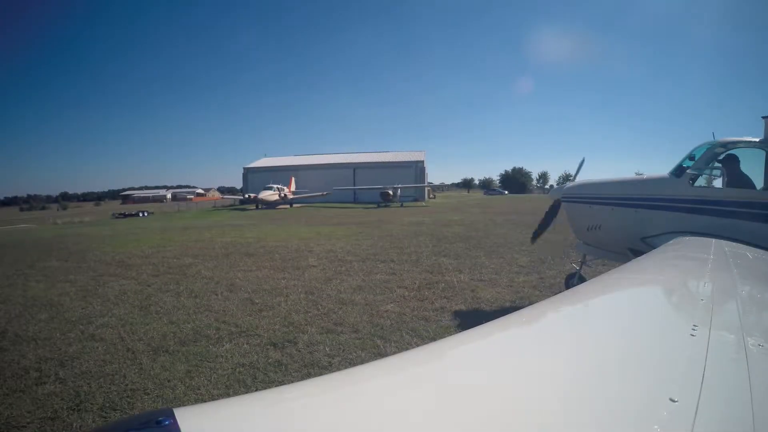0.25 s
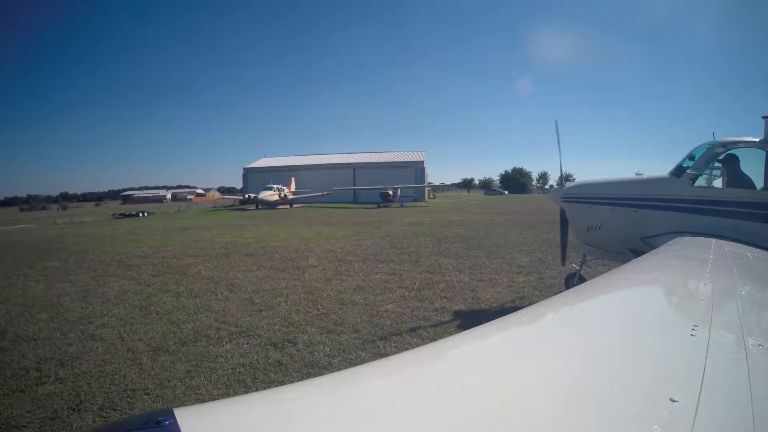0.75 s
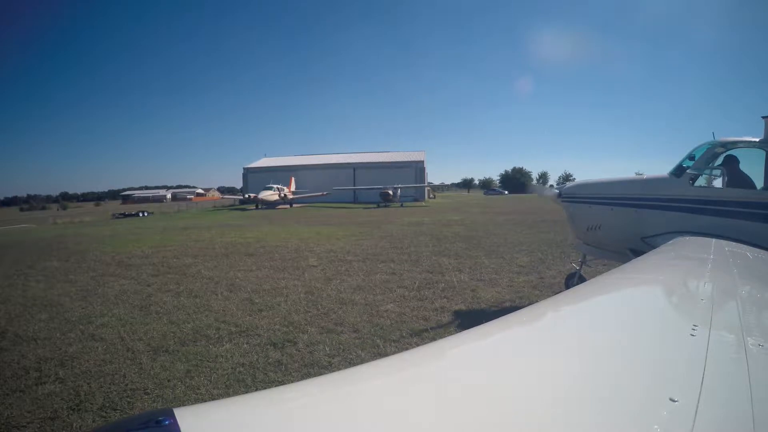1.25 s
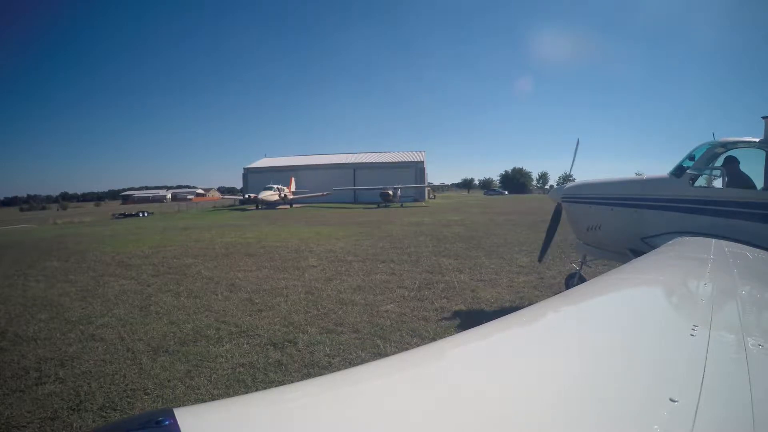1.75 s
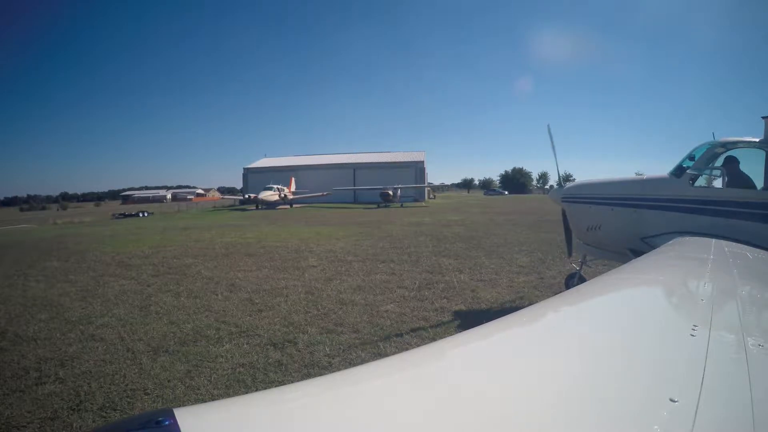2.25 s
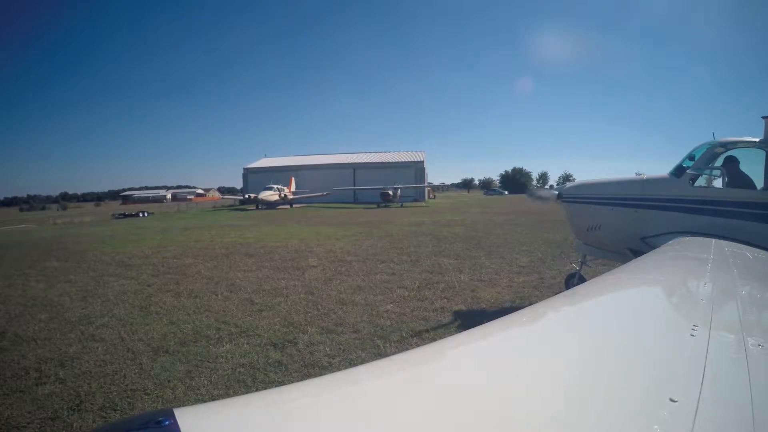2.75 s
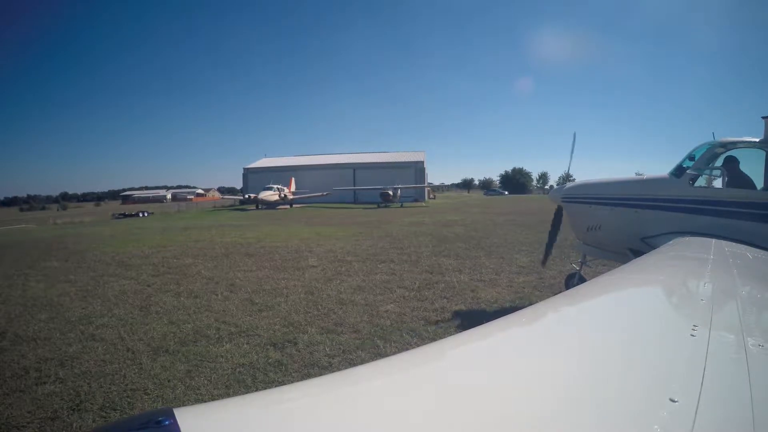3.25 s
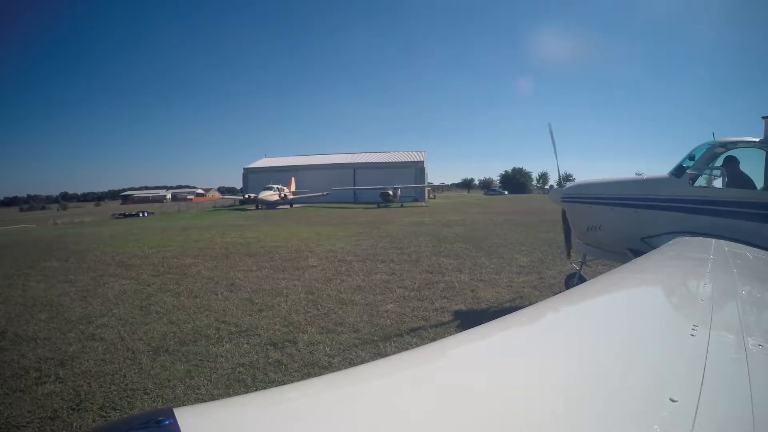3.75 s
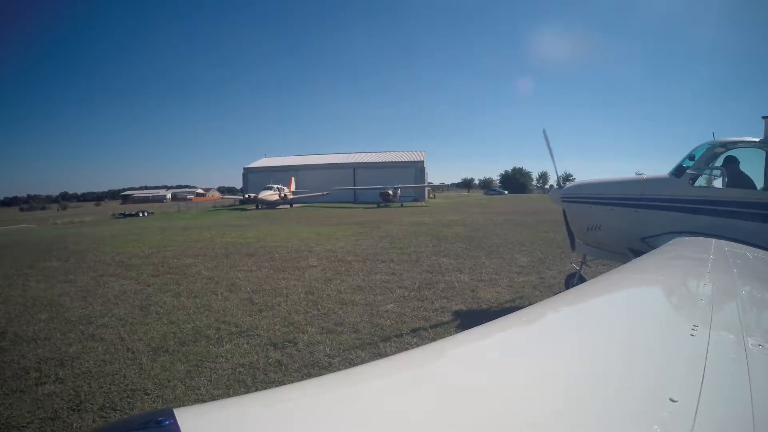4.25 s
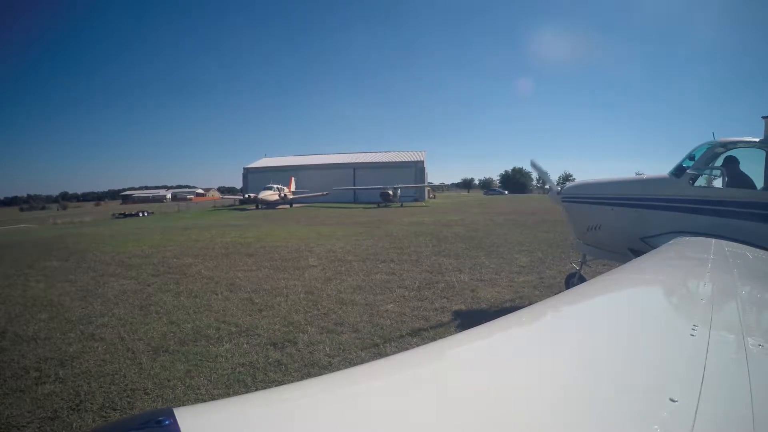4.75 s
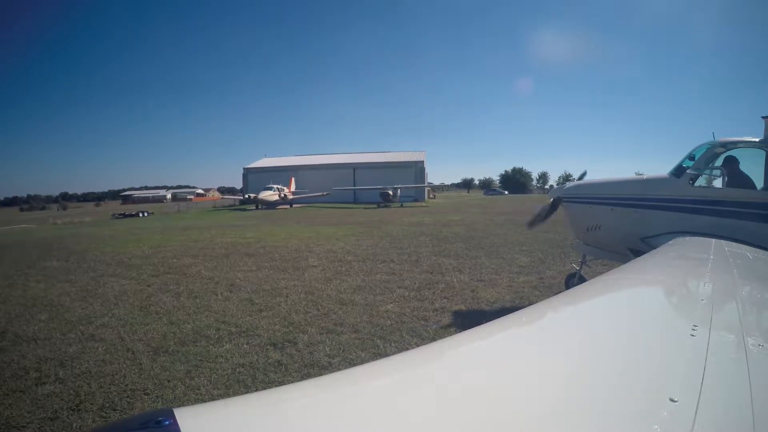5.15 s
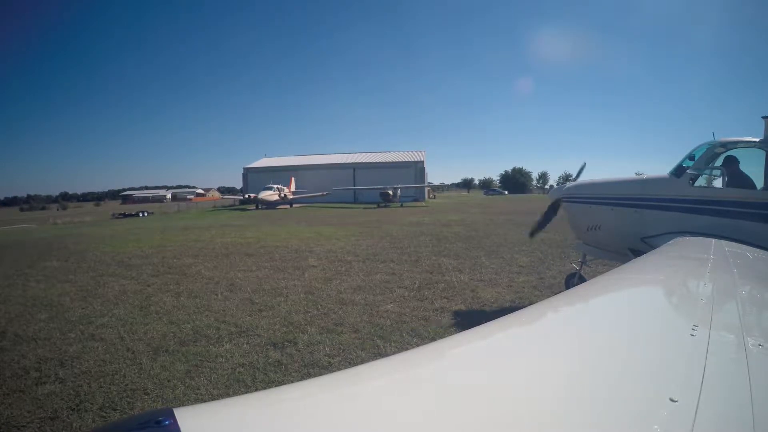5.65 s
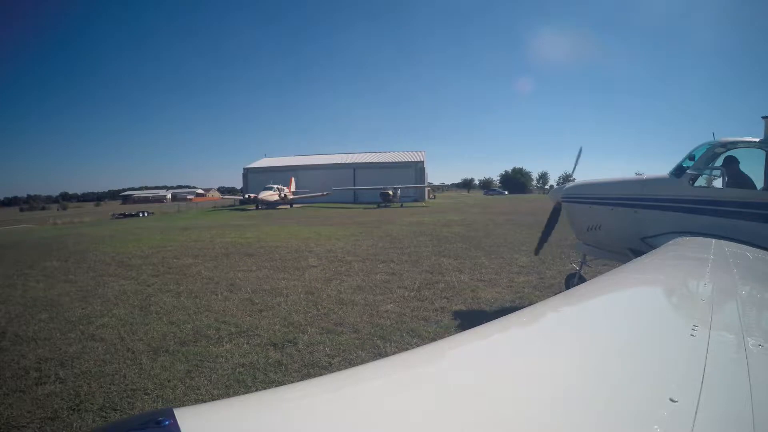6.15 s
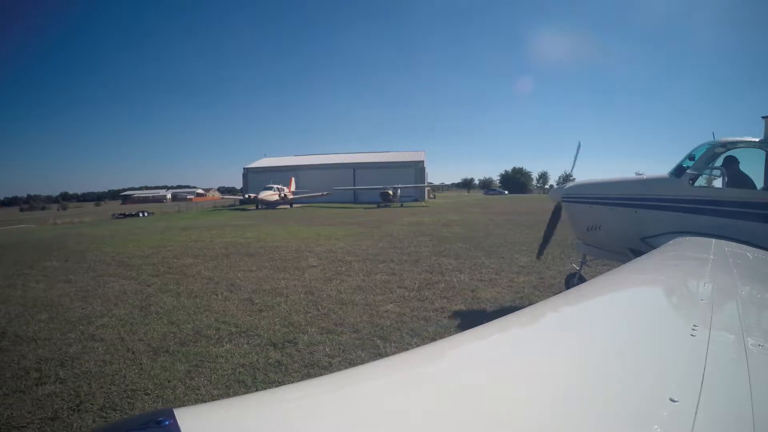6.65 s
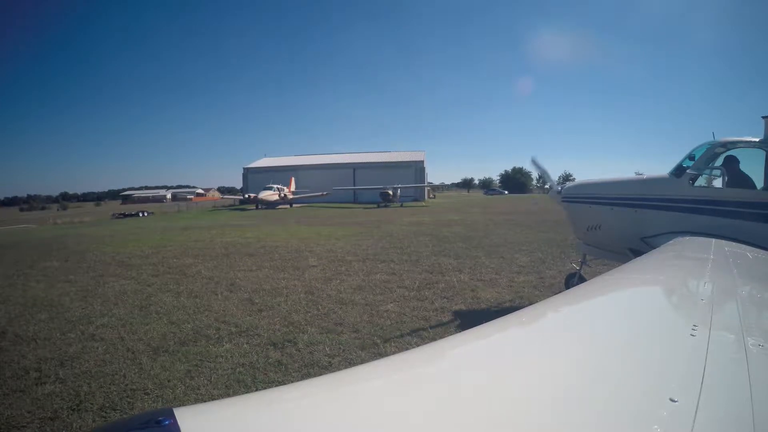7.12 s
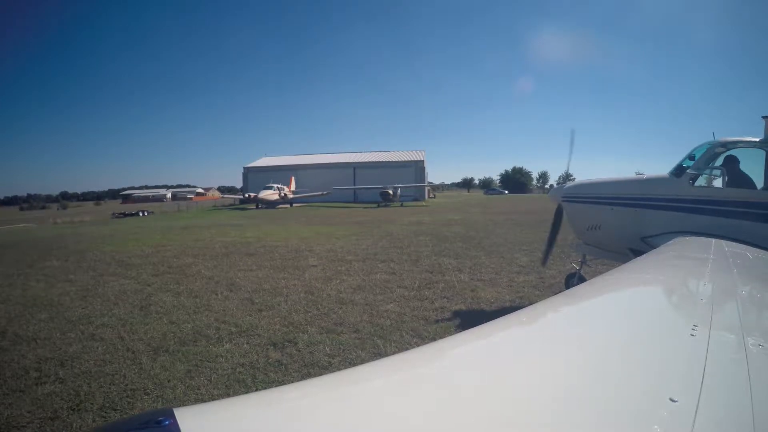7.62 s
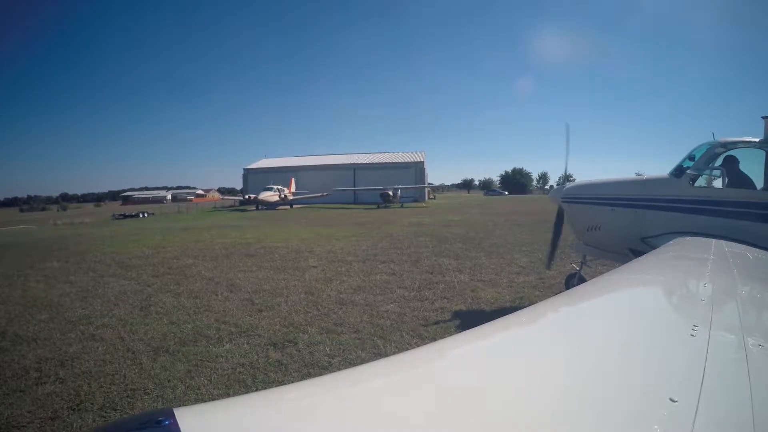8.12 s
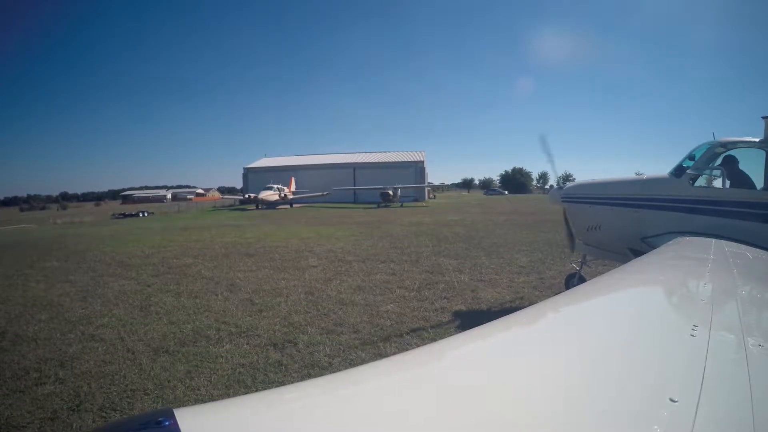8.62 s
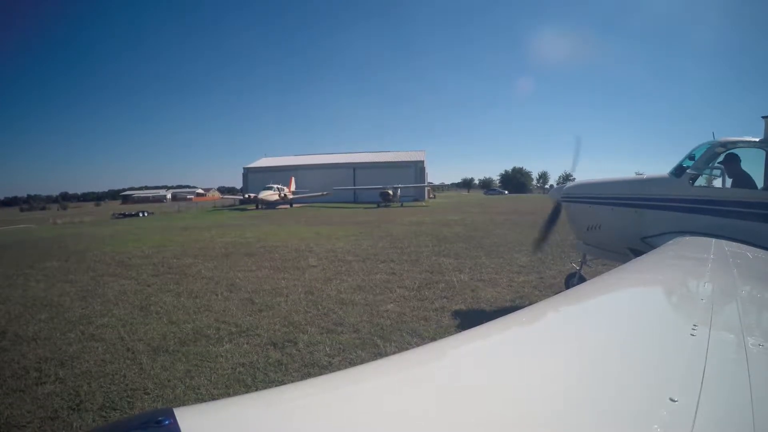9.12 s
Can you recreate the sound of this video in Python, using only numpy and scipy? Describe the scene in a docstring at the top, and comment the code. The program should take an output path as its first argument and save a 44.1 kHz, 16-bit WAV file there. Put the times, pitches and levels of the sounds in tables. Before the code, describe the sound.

A wing-mounted microphone in open air, dry and close, catches a light aircraft engine being started. From 0 to 4 seconds the starter cranks steadily, about five compressions a second: a rough gear whine climbs, then sags into a scrape, with valve rattle and a dull low exhaust puff each time. Under it the wing booms heavily near 45-50 Hz, beating and shuddering, with propeller-wash rumble. From about 4.1 seconds the rhythm becomes less even, the gears grate more, and sharp single or paired coughs crack at 4.5-4.7, 5.2 and 5.8. Between 6.5 and 7.5 coughs come more often, with gear growls and clashes. At 7.6 a loud crackling volley breaks out, the starter whine stops, and a hollow roar surges, falters, and swells again around 8.7, with barks, steel chatter and briefly singing panels. It ends still running weakly and unevenly at about 9.4 seconds.

```python
"""Starting a light aircraft's piston engine

Heard from a microphone on the wing. The starter cranks about five compressions a second: at each one
its gear whine sags, the valves rattle, the exhaust puffs and the wing booms.
Cylinders cough and kick the starter gears, then the engine catches and runs in uneven surges.
Whines are wavering tones; puffs, scrapes and rattles are noise and tiny impacts shaped by what they
pass through. Prop wash rumbles on the microphone, and panels sing briefly.
"""
import sys
import numpy as np
from scipy import signal
from scipy.fft import rfft, irfft, next_fast_len
from scipy.io import wavfile
from scipy.ndimage import uniform_filter1d, map_coordinates

SR = 44100
rng = np.random.default_rng(int(sys.argv[2]) if len(sys.argv) > 2 else 0)


def wav_record(signal):
    """Record a signal, one row per channel, as 16-bit PCM in the file named by sys.argv[1]."""
    frames = np.transpose(np.atleast_2d(signal))
    bounded = np.clip(frames, -1, 1)
    # unit amplitude maps onto the largest positive 16-bit level
    quanta = np.round(bounded * 32767).astype(np.int16)
    wavfile.write(sys.argv[1], SR, quanta)


N = 413658  # length in samples

# All levels in the tables are relative: the functions may add a few dB.
# Compression strokes while the starter turns the engine. Each row: time in seconds, lag of the
# exhaust puff in seconds, puff level in dB, grind level in dB, valve rattle level in dB.
STROKES = [(-.14, .124, -35, -44, -54), (.06, .004, -43.5, -42, -51), (.27, .048, -43, -43, -54.5),
           (.48, .004, -46, -44.5, -55.5), (.684, .04, -36.5, -44.5, -51.5),
           (.888, .052, -43, -45.5, -54.5), (1.085, .072, -42, -44.5, -54.5),
           (1.301, .032, -41.5, -42, -51.5), (1.503, .088, -42.5, -44, -55.5),
           (1.706, .072, -41.5, -43, -54), (1.915, .088, -42, -44.5, -51), (2.114, .072, -40, -44.5, -55),
           (2.315, .08, -41.5, -43, -54), (2.519, .02, -38.5, -42, -51), (2.725, .06, -42, -43.5, -54.5),
           (2.916, .07, -38, -43, -54), (3.121, .08, -41.5, -43.5, -51.5), (3.324, .06, -37.5, -44, -55),
           (3.516, .072, -43.5, -45.5, -56), (3.719, .048, -43, -42, -50.5), (3.925, .1, -44, -48, -62),
           (4.1, .012, -42, -42, -56), (4.255, 0, -41, -40.5, -54.5), (4.426, .052, -43, -40.5, -52.5),
           (4.602, .096, -48, -40.5, -55.5), (4.794, .052, -41, -40, -51), (4.96, .06, -45.5, -39.5, -55),
           (5.259, .04, -42.5, -41, -52.5), (5.426, .05, -37, -40.5, -55), (5.636, 0, -48, -43, -54),
           (5.767, .072, -41.5, -40.5, -51.5), (5.95, .068, -47, -44.5, -65),
           (6.116, .072, -40.5, -43.5, -55.5), (6.303, .06, -40, -45, -54.5),
           (6.48, .04, -40.5, -44.5, -58), (6.66, .068, -38.5, -44, -64.5), (6.807, .04, -44, -39.5, -51.5),
           (6.96, .06, -41, -38.5, -54), (7.22, .024, -50, -41, -57), (7.43, .052, -42, -41, -58),
           (7.64, .032, -39, -37, -51)]
# Sharp firings of a cylinder, often in quick pairs. Each row: start in seconds, level of the bark in dB,
# level of the low thud in dB.
FIRINGS = [(4.53, -33, -50), (4.63, -32, -50), (4.706, -27, -48), (5.243, -34, -48), (5.278, -31, -46),
           (5.762, -29.5, -48), (6.654, -34.5, -46), (6.815, -33, -50), (6.838, -32, -48),
           (6.996, -29.5, -39), (7.213, -29, -52), (7.397, -30.5, -52), (7.445, -32, -42),
           (7.632, -16, -38), (7.664, -22.5, -31), (7.688, -25, -30), (7.734, -19, -38), (7.757, -26, -43),
           (7.796, -28, -44), (7.81, -29, -43), (7.938, -25, -45), (8.003, -30, -42), (8.023, -24.5, -38),
           (8.038, -28, -44), (8.193, -32, -40), (8.286, -26, -44), (8.401, -26, -50), (8.418, -32, -52),
           (8.51, -35, -50), (8.535, -35, -48), (8.565, -35, -44), (8.677, -24, -33), (8.74, -20.5, -39),
           (8.78, -30, -36), (8.798, -19.5, -37), (8.815, -25, -43), (9.028, -32, -50), (9.118, -34.5, -46),
           (9.265, -35, -44)]
# A coughing cylinder kicks the starter gears, which growl and then clash. Each row: time in seconds,
# growl level in dB, time across the slack between the teeth in seconds, clash level in dB.
KICKS = [(4.066, -43.5, .049, -51), (4.928, -40, .056, -43.5), (6.46, -40, .05, -50),
         (6.928, -38, .054, -43), (7.197, -41.5, .055, -42.5), (7.394, -43, .06, -43.5),
         (7.598, -37, .05, -46.5)]
# Power of the engine as it catches and falters. Each row: time in seconds, level in dB.
SURGE = [(6, -78), (7.25, -56), (7.58, -63), (7.66, -38.5), (7.76, -39.5), (7.83, -44), (7.9, -52),
         (8.02, -45), (8.12, -54), (8.19, -47), (8.3, -48), (8.38, -60), (8.46, -55), (8.56, -50),
         (8.7, -44), (8.82, -43), (8.95, -59), (9.14, -51), (9.38, -51)]
# Starter gears: once cylinders cough they sing less and grate more. Each row: time in seconds,
# singing level in dB, grating level in dB.
DRIVE = [(3.5, .7, -1.5), (4.3, -3.5, 2.5), (5.8, -4, 2.8), (6.3, -3, -.5), (7.5, -5, -.5)]
# Tone colour of growling gears. Each row: frequency in Hz, relative level in dB per Hz.
GROWL = [(600, -24), (1200, -7), (1650, 5), (2350, -1), (2700, -13), (4000, -34.5), (8000, -60.5)]
# Resonances of the cowling panels. Each row: frequency in Hz, width in Hz, lift in dB.
PANELS = [(887, 54, 1), (1000, 91, 1.6), (1084, 36, 2.1), (1370, 100, 4), (1780, 18, 5.6), (1970, 26, 6.5),
          (2120, 25, 3.9), (2310, 27, 5.5)]


def amp(db):
    """Turn decibels into a gain."""
    return 10 ** (np.asarray(db) / 20)


def unit(x):
    """Scale to an average (rms) strength of 1."""
    return x / np.sqrt(np.mean(x ** 2) + 1e-20)


def curve(rows):
    """Draw straight lines through (seconds, value) rows, giving one value per sample."""
    return np.interp(np.arange(N) / SR, *np.transpose(rows))


def wobble(rate):
    """Make a smooth random curve through a number of random points a second."""
    knots = rng.standard_normal(int(N * rate / SR) + 4)
    coarse = np.arange(0, N + 8, 8)  # every eighth sample is enough for a smooth curve
    return np.interp(np.arange(N), coarse, map_coordinates(knots, [coarse * rate / SR]))


def body(x, spectrum, peaks=()):
    """Pass x through a body with a broad tone colour and narrow resonances; white noise keeps its level."""
    size = 2 * next_fast_len(N // 2 + 8192)
    hz = np.fft.rfftfreq(size, 1 / SR)
    f, level = np.transpose(spectrum)
    db = np.interp(np.log(hz + 1), np.log(f), level)
    for centre, width, lift in peaks:
        db = db + lift / (1 + (2 * (hz - centre) / width) ** 2)
    # fold the cepstrum forward in time, so that the body answers only after it is struck
    cepstrum = irfft(np.log(unit(amp(db))))
    cepstrum[1:size // 2] *= 2
    cepstrum[size // 2 + 1:] = 0
    response = np.exp(rfft(cepstrum))
    return irfft(rfft(x, size) * response, size)[:N]


def contacts(rate, share, size=N):
    """Mix tiny random impacts, rate a second, with smooth noise; the impacts get a share of the power."""
    share = np.clip(share, 0, 1)
    hits = (rng.random(size) < rate / SR) * rng.standard_normal(size)
    return np.sqrt(share) * unit(hits) + np.sqrt(1 - share) * rng.standard_normal(size)


def swells(times, levels_db, shape):
    """Add up the power of swells whose shape is (delay in s, rise in s, fall in s, gain in dB)."""
    delay, rise, fall, gain_db = shape
    t, power = np.arange(N) / SR, np.zeros(N)
    for s, db in zip(times, levels_db):
        near = slice(max(int((s - .2) * SR), 0), int((s + .5) * SR))
        u = t[near] - s - delay
        fade = np.where(u < 0, (u / rise) ** 2, np.abs(u / fall) ** 1.5)
        power[near] += amp(db + gain_db) ** 2 * np.exp(-fade)
    return power


def narrow(turn, width_hz):
    """Make a rough tone: its strength and phase wander at width_hz random points a second."""
    return unit(wobble(width_hz) * np.sin(turn) + wobble(width_hz) * np.cos(turn))


def drift(x, share, rate):
    """Let the pitch of x wander by a small share, through rate random points a second."""
    place = np.arange(N) + SR * share / rate * wobble(rate)
    return map_coordinates(x, [place], order=3, mode="nearest")


def patchy(x, depth_db):
    """Let short random patches of the spectrum swell and fade, as in turbulence."""
    z = signal.stft(x, nperseg=1024)[2]
    field = uniform_filter1d(rng.standard_normal(z.shape), size=3, axis=0)  # smooth over pitch
    field = uniform_filter1d(field, size=6, axis=1)  # smooth over time
    return signal.istft(z * unit(amp(depth_db * unit(field))), nperseg=1024)[1][:N]


def starter():
    """The rough gear whine climbs as the crank runs free and sags against each compression."""
    # Gear mesh from one compression to the next. Each row: share of the stroke (0 to 1),
    # pitch in Hz, level in dB.
    mesh = [(0, 1674, -49), (.151, 1378, -52), (.301, 1251, -60.5), (.52, 1946, -78.5), (.69, 2070, -59.5),
            (.8, 2010, -54.5), (.9, 1900, -54.5), (1, 1678, -49)]
    t = np.arange(N) / SR
    times = np.transpose(STROKES)[0]
    stroke = np.interp(t, times, np.arange(len(times))) % 1
    place, pitch, level = np.transpose(mesh)
    drive_s, sing_db, grate_db = np.transpose(DRIVE)
    turn = 2 * np.pi * np.cumsum(np.interp(stroke, place, pitch)) / SR
    # the teeth sing under light load and grate under heavy load
    free = np.interp(stroke, [.4, .65, .9, 1], [0, 1, 1, 0])
    sing = narrow(turn, width_hz=270)
    sing += amp(-9.5) * narrow(2 * np.pi * 3780 * t, width_hz=400)  # the housing rings at 3780 Hz
    sing += amp(-13.5) * narrow(2.25 * turn, width_hz=450)
    sing *= free * amp(np.interp(t, drive_s, sing_db))
    grate = narrow(turn, width_hz=500) * np.sqrt(1 - free.clip(0, 1) ** 2)
    grate *= amp(np.interp(t, drive_s, grate_db))
    return (sing + grate) * amp(np.interp(stroke, place, level)) * (t < times[-1])


def firings():
    """A cylinder fires: a hard, crackling bark and a low thud, then a weaker rush of gas."""
    # Tone colours. Each row: frequency in Hz, relative level in dB per Hz.
    bark_colour = [(120, -23), (300, -13.5), (480, -7), (700, -6.5), (1000, 8), (1400, -8), (2200, -4),
                   (2900, -25), (8000, -40), (15000, -47)]
    thud_colour = [(50, -16), (95, 0), (140, -6), (280, -9), (520, -15), (900, -28), (3000, -70)]
    t = np.arange(SR // 8) / SR
    blast = (1 - np.exp(-t / .0007)) * np.exp(-(t / .011) ** 2)
    blast += amp(-13 - 60 * t / .11)  # the rush of gas
    push = (1 - np.exp(-t / .002)) * amp(-60 * t / .11)
    barks, thuds = np.zeros((2, N + SR))
    for s, bark_db, thud_db in FIRINGS:
        start = int(s * SR)
        barks[start:][:len(t)] += amp(bark_db - 8.5) * blast
        thuds[start:][:len(t)] += amp(thud_db + .5) * push
    bark = body(contacts(rate=1200, share=.45) * barks[:N], bark_colour, PANELS)
    thud = body(rng.standard_normal(N) * thuds[:N], thud_colour)
    return drift(bark, share=.025, rate=9) + thud


def surge():
    """When several cylinders fire in a row, the exhaust gives a hollow roar."""
    # each pair: frequency in Hz, relative level in dB per Hz
    hollow = [(150, -33), (260, -5.5), (330, -1.5), (400, -3), (500, -2.5), (620, -5.5),
              (800, -12.5), (1500, -35), (4000, -70)]
    return body(contacts(rate=160, share=0.3) * amp(curve(SURGE)), hollow)


def exhaust():
    """Strokes puff air out of the pipe and the engine blows; prop wash rumbles harder with each puff."""
    # Tone colour of the pipe. Each row: frequency in Hz, relative level in dB per Hz.
    pipe_colour = [(60, -18), (100, 4), (130, 2.5), (170, -1.5), (280, -1), (340, -5.2), (550, -7),
                   (750, -8.5), (1200, -33), (3000, -65)]
    # Resonance of the pipe. Each row: frequency in Hz, width in Hz, lift in dB.
    pipe_peaks = [(282.2, 11, 7)]
    # Shape of a puff: delay in seconds, rise in seconds, fall in seconds, gain in dB.
    puff_shape = (-.01, .045, .033, .3)
    # Air leaking through the exhaust between the puffs. Each row: time in seconds, level in dB.
    leak = [(0, -44.5), (2.4, -43.5), (4.3, -44.5), (5, -47), (6.5, -48), (7.2, -53), (9.38, -48)]
    # Prop wash on the microphone. Each row: time in seconds, level in dB.
    wash_level = [(0, -40), (1.2, -42), (3.5, -38.5), (4.5, -42), (6, -46.5), (7.1, -47), (7.7, -40),
                  (8.3, -44), (8.7, -38), (9, -44), (9.38, -37)]
    times, lag, puff_db, _, _ = np.transpose(STROKES)
    power = swells(times + lag, puff_db, puff_shape)
    power = power + amp(curve(SURGE) + 2.5) ** 2 + amp(curve(leak)) ** 2
    flow = np.sqrt(power) * amp(2.2 * wobble(55) - .3)
    puffs = body(contacts(rate=300, share=0.33) * flow, pipe_colour, pipe_peaks)
    puffs = patchy(drift(puffs, share=.014, rate=6), depth_db=1.7)
    # each pair: frequency in Hz, relative level in dB per Hz
    rumble = [(30, -11), (80, 1), (115, -3.5), (145, -13.5), (180, -12), (240, -26), (1000, -57)]
    wash = body(rng.standard_normal(N), rumble)
    return puffs + wash * amp(curve(wash_level)) * np.sqrt(unit(flow))


def grind():
    """Pistons and gears scrape at compressions, kicks and surges, over a dull churning."""
    # Tone colours of the cowling and of the turning engine. Each row: frequency in Hz,
    # relative level in dB per Hz.
    cowling = [(250, -23), (500, -17), (720, -0.5), (1050, 5), (1220, -2), (1400, -1), (1650, -7),
               (2150, -11), (2400, -15.5), (2700, -23), (4500, -28), (6000, -37.5), (10000, -45.5),
               (15000, -61)]
    churn_colour = [(250, -24), (500, -17), (750, 0), (1060, 4), (1250, -3), (1450, -2), (1800, -11),
                    (2400, -16), (2800, -28), (8000, -50)]
    # Churning. Each row: time in seconds, level in dB.
    churn_level = [(0, -51.5), (3.8, -51.5), (4.6, -49.5), (6.3, -50.5), (7.1, -48.5), (9.38, -52)]
    # Shapes of the scrape at a stroke, the scrape at a kick and the gear growl at a stroke.
    # Each holds: delay in seconds, rise in seconds, fall in seconds, gain in dB.
    stroke_shape = (.008, .022, .064, .2)
    kick_shape = (.03, .025, .05, -1)
    growl_shape = (0, .03, .045, 0)
    times, *_, grind_db, _ = np.transpose(STROKES)
    kicks, kick_db, *_ = np.transpose(KICKS)
    drive_s, _, grate_db = np.transpose(DRIVE)
    power = swells(times, grind_db, stroke_shape) + swells(kicks, kick_db, kick_shape)
    load = np.sqrt(power + amp(curve(SURGE) + 4.2) ** 2) * amp(1.4 * wobble(40))
    scrape = body(contacts(rate=350, share=0.25) * load, cowling, PANELS)
    churn_gain = amp(curve(churn_level) + 1.2 * wobble(30))
    churn = body(contacts(rate=400, share=.15) * churn_gain, churn_colour, PANELS)
    strain = amp(1.6 * np.interp(np.arange(N) / SR, drive_s, grate_db) - 12)
    growl_gain = np.sqrt(swells(times, grind_db, growl_shape)) * strain
    growl = body(contacts(rate=350, share=0.4) * growl_gain, GROWL, PANELS)
    return patchy(scrape + churn, depth_db=1.3) + growl


def chatter():
    """List the bursts of steel chatter as (s, level dB, kind): at strokes, kicks, firings and between."""
    # Valve gear between the compressions and in the running engine. Each row: time in seconds,
    # clatter level in dB, ring level in dB, length in seconds.
    loose_rattles = [(5.004, -51, -55, .012), (5.085, -58, -68, .03), (7.001, -50, -51, .01),
                     (7.603, -51, -55, .016), (7.634, -45, -43, .008), (7.66, -45, -48, .04),
                     (7.722, -47, -50, .023), (7.817, -54, -56, .021), (7.859, -45, -58, .01),
                     (7.873, -52, -55, .016), (8.02, -56, -65, .014), (8.068, -49.5, -53.5, .026),
                     (8.167, -52, -68, .01), (8.19, -56, -66, .016), (8.215, -48, -58, .023),
                     (8.29, -55, -61, .022), (8.329, -51.5, -56, .034), (8.398, -58, -64, .013),
                     (8.449, -51.5, -59, .023), (8.536, -59, -66, .012), (8.58, -49, -58, .016),
                     (8.624, -54, -60, .024), (8.686, -51.5, -58, .014), (8.732, -50, -57, .025),
                     (8.789, -52.5, -56, .022), (8.833, -52, -58, .023), (8.925, -57, -70, .017),
                     (8.974, -56, -64, .023), (9.06, -53.5, -66, .016), (9.145, -57, -65, .02),
                     (9.161, -51, -65, .012), (9.191, -50, -63, .013), (9.319, -54.5, -65, .024)]
    # Weaker valve ticks after each compression. Each row: delay in seconds, relative level in dB.
    valve_ticks = [(.048, -13), (.092, -16)]
    # Kinds of chatter. Each holds: growl in dB, clatter in dB, ring in dB (all relative to the burst),
    # rise in seconds, length in seconds.
    valve_rattle = (-.5, .2, -9.3, .0085, .026)
    gear_growl = (0, -11, -15.5, .015, .036)
    gear_clash = (0, -.7, -4, .014, .027)
    growl_after_s = .013  # the teeth take up the load
    bursts = []
    for s, *_, db in STROKES:
        for delay, drop_db in [(0, 0), *valve_ticks]:
            bursts.append((s + delay, db + drop_db, valve_rattle))
    for s, db, ring_db, length in loose_rattles:
        # growl 1.5 dB below the clatter; the rise is half of the length
        bursts.append((s, db, (-1.5, 0, ring_db - db, .5 * length, length)))
    for s, db, _ in FIRINGS:
        bursts.append((s + growl_after_s, db - 30.5, gear_growl))  # a firing jolts the gears too
    for s, growl_db, slack_s, clash_db in KICKS:
        bursts.append((s + growl_after_s, growl_db, gear_growl))
        bursts.append((s + slack_s, clash_db, gear_clash))
    return bursts


def steel_part(t60, ring_share, count):
    """A click with fresh random ringing tones, as if each swarm strikes other parts."""
    t = np.arange(SR // 25) / SR
    hz = np.geomspace(1400, 12000, count)[:, None] * np.exp(.05 * rng.standard_normal((count, 1)))
    modes = rng.standard_normal((count, 1)) * np.sqrt(hz) * np.sin(2 * np.pi * hz * t)
    ring = modes.sum(0) * amp(-60 * t / t60)  # falls by 60 dB in t60 seconds
    share = np.clip(ring_share, 0, 1)
    response = np.sqrt(share / 2) * ring / np.linalg.norm(ring)  # the modes cover about half of the band
    response[0] += np.sqrt(1 - share)
    return response


def rattles():
    """Gear teeth and valve gear chatter in swarms of steel contacts that growl, clatter and ring."""
    # Tone colours. Each row: frequency in Hz, relative level in dB per Hz.
    clatter_colour = [(1000, -26.5), (2200, -16.5), (2800, -3.5), (3600, 2.5), (4600, -3), (5200, -8),
                      (6200, -15), (9000, -31)]
    ring_colour = [(4000, -30), (5600, -8.5), (6800, 2.5), (7300, -3), (8100, 2.5), (8700, -9), (9500, -3),
                   (11000, -11), (14000, -19), (16000, -33)]
    # Resonances of the steel parts. Each row: frequency in Hz, width in Hz, lift in dB.
    steel_peaks = [(2840, 30, 9), (3500, 45, 4), (3810, 80, 6), (4100, 60, 3), (4560, 90, 6), (5220, 90, 4),
                   (6820, 90, 7), (7620, 45, 6), (7730, 40, 7), (8090, 95, 7), (9010, 55, 7),
                   (9370, 150, 4)]
    t = np.arange(N) / SR
    swarms = np.zeros((3, N))
    for s, db, (*colour_db, rise, length) in chatter():
        if s < 0:
            continue
        near = slice(max(int((s - .1) * SR), 0), int((s + .1) * SR))
        u = t[near] - s + 0.002
        u = u / np.where(u < 0, rise, 0.51 * length)
        # power of the swarm: the rise and the fall have their own curves
        swell = np.where(u < 0, np.exp(-np.abs(u) ** 3), np.exp(-np.abs(u) ** 1.6))
        hits = contacts(rate=950, share=0.45, size=len(u)) * np.sqrt(swell)
        hits = unit(hits) * np.sqrt(swell.mean()) * amp(db)
        part = steel_part(t60=0.033, ring_share=.45, count=34)
        struck = signal.fftconvolve(hits, part)[:len(u)]
        swarms[:, near] += amp(colour_db)[:, None] * struck
    growl, clatter, ring = swarms * amp(.9 * wobble(110) - .3)  # the contacts come in clumps
    growl = body(growl, GROWL, PANELS)
    clatter = amp(.5) * body(clatter, clatter_colour, steel_peaks)
    ring = amp(1.5) * body(ring, ring_colour, steel_peaks)
    return growl + clatter + ring


def beats():
    """The wing's vibration beats: it dips for a moment and slips half a cycle (a complex gain)."""
    # Each row: time in seconds, level at the bottom of the dip in dB, half width in seconds.
    dips = [(0.197, -16, 0.03), (0.273, -21, 0.009), (0.521, -25, 0.015), (0.593, -7, 0.03),
            (0.777, -13, 0.03), (1.05, -8, 0.03), (1.457, -12, 0.02), (1.612, -11, 0.016),
            (1.708, -13, 0.019), (1.864, -24, 0.03), (1.955, -13, 0.024), (2.065, -11, 0.019),
            (2.145, -12, 0.015), (2.238, -21, 0.012), (2.296, -24, 0.01), (2.359, -26, 0.03),
            (2.439, -9, 0.019), (2.707, -9, 0.03), (2.845, -16, 0.03), (2.959, -12, 0.009),
            (3.033, -26, 0.023), (3.165, -21, 0.011), (3.437, -6, 0.019), (3.511, -13, 0.015),
            (3.635, -24, 0.012), (3.726, -14, 0.012), (3.963, -13, 0.026), (4.149, -20, 0.024),
            (4.208, -26, 0.018), (4.386, -23, 0.014), (4.652, -17, 0.01), (4.739, -17, 0.028),
            (4.789, -20, 0.02), (4.972, -10, 0.015), (5.338, -21, 0.022), (5.394, -16, 0.008),
            (5.724, -19, 0.019), (5.959, -12, 0.028), (6.137, -6, 0.01), (6.27, -25, 0.03),
            (6.408, -14, 0.011), (6.463, -12, 0.03), (6.662, -9, 0.008), (6.761, -12, 0.021),
            (6.964, -5, 0.03), (7.407, -10, 0.03), (7.616, -9, 0.012), (7.768, -17, 0.016),
            (7.898, -16, 0.019), (7.994, -3, 0.007), (8.123, -20, 0.013), (8.527, -22, 0.03),
            (8.583, -18, 0.023), (9.039, -8, 0.028)]
    gain = np.ones(N, complex)
    for s, depth_db, width in dips:
        start = max(int((s - 7 * width) * SR), 0)
        end = min(int((s + 7 * width) * SR), N)
        u = np.tanh((np.arange(start, end) / SR - s) / width)  # runs from -1 to 1 across the dip
        gain[start:end] *= u + 1j * amp(min(depth_db, 0)) * np.sqrt(1 - u * u)
        gain[:start] *= -1
    return gain


def wing():
    """Strokes and engine lurches make the wing boom with beats, and a looser shudder rides on top."""
    # Booms, from strokes and from lurches of the engine in its mounts. Each row: time in seconds,
    # level in dB, length in seconds, base pitch in Hz.
    booms = [(0.05, -13.0, 0.058, 43.6), (0.179, -12.0, 0.028, 48.3), (0.311, -9.5, 0.018, 46.6),
             (0.745, -8.0, 0.048, 48.9), (0.94, -14.0, 0.017, 45.9), (1.153, -15.0, 0.028, 50.9),
             (1.335, -8.5, 0.023, 46.1), (1.582, -13.5, 0.016, 44.8), (1.787, -10.5, 0.033, 46.9),
             (1.99, -15.0, 0.016, 51.0), (2.177, -9.5, 0.025, 46.0), (2.355, -7.5, 0.058, 47.2),
             (2.561, -9.5, 0.037, 50.0), (2.785, -13.0, 0.013, 43.9), (2.988, -11.0, 0.022, 45.5),
             (3.23, -15.0, 0.012, 46.5), (3.382, -11.0, 0.021, 48.1), (3.484, -11.5, 0.029, 49.9),
             (3.6, -14.5, 0.017, 44.7), (3.759, -9.5, 0.036, 46.2), (3.924, -14.5, 0.012, 49.2),
             (4.113, -12.0, 0.017, 47.5), (4.243, -9.0, 0.015, 44.4), (4.485, -9.0, 0.044, 49.4),
             (4.735, -6.5, 0.044, 49.7), (4.839, -9.5, 0.019, 44.0), (4.923, -13.0, 0.017, 49.6),
             (5.026, -11.5, 0.045, 49.2), (5.255, -14.5, 0.058, 49.4), (5.494, -8.5, 0.056, 50.4),
             (5.839, -15.0, 0.037, 49.3), (6.023, -14.0, 0.058, 50.4), (6.192, -12.0, 0.012, 49.6),
             (6.267, -7.0, 0.019, 45.5), (6.525, -9.5, 0.03, 49.8), (6.743, -9.0, 0.058, 50.2),
             (6.863, -9.0, 0.025, 46.8), (7.014, -9.5, 0.027, 50.1), (7.281, -12.5, 0.021, 48.7),
             (7.493, -10.5, 0.058, 49.7), (7.679, -7.5, 0.058, 49.7), (7.795, -15.0, 0.012, 41.7),
             (7.931, -10.0, 0.038, 48.4), (8.062, -10.0, 0.029, 47.3), (8.206, -8.5, 0.039, 47.5),
             (8.313, -8.5, 0.049, 47.6), (8.631, -11.5, 0.058, 46.1), (8.838, -10.0, 0.043, 47.8),
             (9.167, -14.0, 0.023, 48.4), (9.314, -12.0, 0.044, 45.6)]
    # Steady shaking between the jolts. Each row: time in seconds, level in dB.
    tremble = [(0, -17), (2, -16), (4, -15), (5.2, -17), (5.7, -21), (6.2, -15), (7.6, -16), (7.85, -25),
               (8.38, -20), (8.5, -28), (8.6, -13), (9.02, -16), (9.38, -14)]
    # Irregular shudder. Each row: time in seconds, level relative to the booms in dB.
    shudder_level = [(0, -7), (4, -8), (6.8, -12), (9.38, -15)]
    # Tone colour of the shudder. Each row: frequency in Hz, relative level in dB per Hz.
    wing_colour = [(12, -44), (20, -11), (27, -8), (38, -2), (45, -5), (54, -1), (60, -7), (70, -17),
                   (82, -18), (110, -41.5), (300, -100)]
    t = np.arange(N) / SR
    power = amp(curve(tremble)) ** 2
    for s, db, length, _ in booms:
        power = power + swells([s], [db], (0, .7 * length, length, 0))
    times, _, _, base_hz = np.transpose(booms)
    pitch = np.interp(t, times, base_hz)
    pitch = pitch + 1.3 * np.sqrt(power / power.max())  # harder shaking raises the pitch, up to 1.3 Hz
    pitch = pitch + 1.8 * wobble(14)  # random wander, in Hz
    turn = 2 * np.pi * np.cumsum(pitch) / SR
    boom = np.sqrt(2) * np.real(np.exp(1j * turn) * beats()) * amp(.8 * wobble(25) - .4)
    shudder = unit(body(rng.standard_normal(N), wing_colour)) * amp(curve(shudder_level))
    low_pass = signal.butter(6, 80, fs=SR, output="sos")  # 80 Hz
    return signal.sosfiltfilt(low_pass, np.sqrt(power) * (boom + shudder))


def airframe():
    """Panels and struts sing for a moment, each at its own rough pitch."""
    # Each row: middle in seconds, half of the time window in seconds, pitch in Hz, level in dB.
    sings = [(.47, .22, 281, -48), (1.98, .08, 281, -46), (2.15, .08, 279, -47), (2.96, .06, 280, -43),
             (3.73, .06, 712, -47), (3.78, .1, 812, -49), (4.48, .14, 812, -48), (5.47, .36, 808, -50),
             (6.76, .18, 284, -48), (7.29, .18, 326, -48), (7.33, .16, 358, -52), (7.81, .06, 712, -44),
             (8.02, .06, 282, -41), (8.22, .18, 280, -44), (8.7, .06, 505, -41), (8.79, .06, 490, -42),
             (8.812, .03, 1020, -39), (9.17, .1, 711, -44)]
    t, out = np.arange(N) / SR, np.zeros(N)
    waver = wobble(22) + 1j * wobble(22)  # strength and phase wander
    waver = waver / np.sqrt(np.abs(waver) ** 2 + .3)  # evens out the strength
    for s, length, hz, db in sings:
        near = np.abs(t - s) < length
        swell = np.exp(-(2 * (t[near] - s) / length) ** 4)
        tone = np.real(waver[near] * np.exp(2j * np.pi * hz * t[near]))
        out[near] += amp(db + 2.5) * swell * tone
    return out


def rustle():
    """A faint hiss of machinery and air pulses with the strokes and drops once the starter lets go."""
    # Tone colour of the hiss. Each row: frequency in Hz, relative level in dB per Hz.
    hiss_colour = [(800, -21), (1500, -1), (2000, -4), (2650, -13.5), (3700, -10.5), (4600, -15.5),
                   (5100, -18), (7300, -20), (8200, -17.5), (8900, -22), (14000, -35), (15500, -49)]
    # Swell around each compression: delay in seconds, rise in seconds, fall in seconds, gain in dB.
    rasp_shape = (-.02, .04, .04, -8.5)
    level = np.interp(np.arange(N) / SR, [7.5, 7.9], [-61.5, -63])  # dB
    times, *_, rattle_db = np.transpose(STROKES)
    power = amp(level + 2.2 * wobble(16)) ** 2 + swells(times, rattle_db, rasp_shape)
    return body(contacts(rate=900, share=.25) * np.sqrt(power), hiss_colour)


def scene():
    """Add up all sources in the open air, without echo."""
    engine = starter() + firings() + surge() + exhaust() + grind() + rattles()
    return (engine + wing() + airframe() + rustle())[None]


def record(dry):
    """The microphone keeps nothing above its band limit."""
    top_hz = 15650
    size = next_fast_len(N + SR // 2)
    keep = np.fft.rfftfreq(size, 1 / SR) < top_hz
    return irfft(rfft(dry, size) * keep, size)[:, :N]


dry = scene()
out = record(dry)
wav_record(out)
```